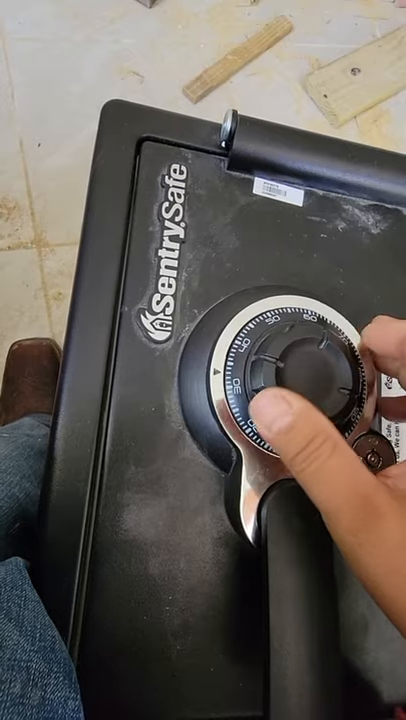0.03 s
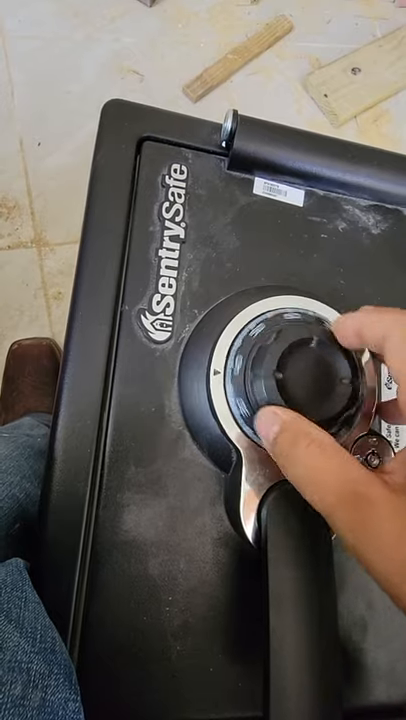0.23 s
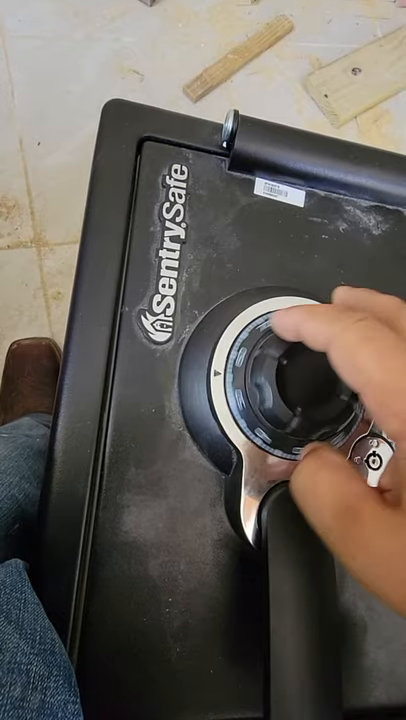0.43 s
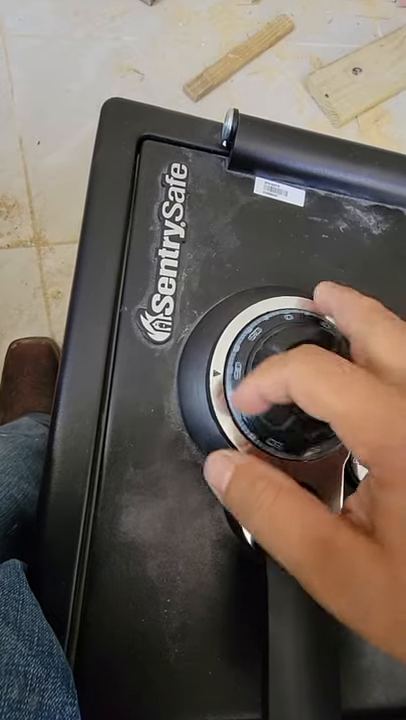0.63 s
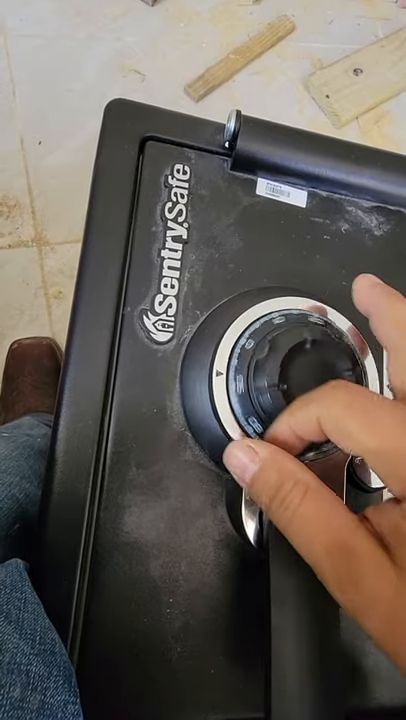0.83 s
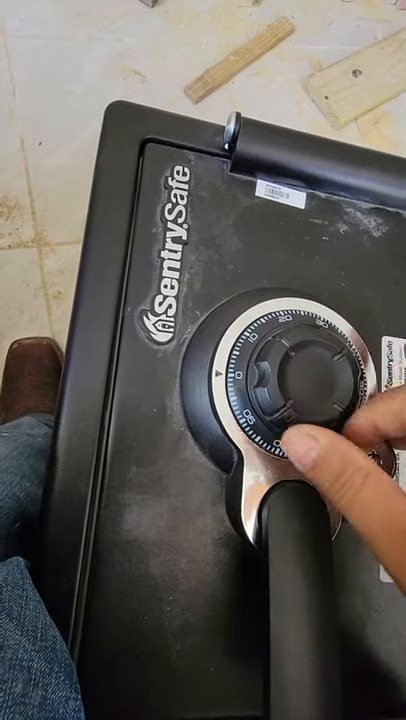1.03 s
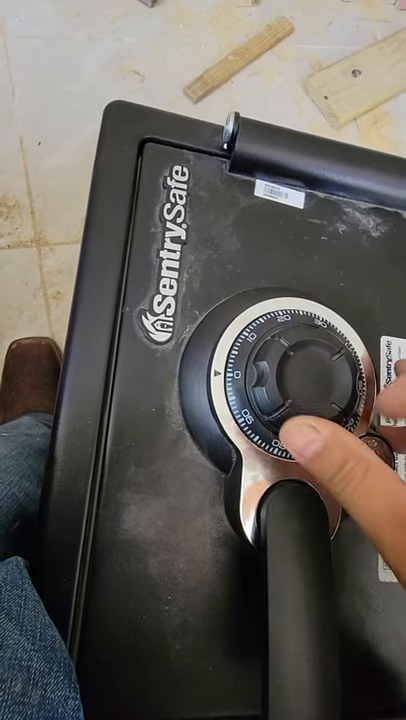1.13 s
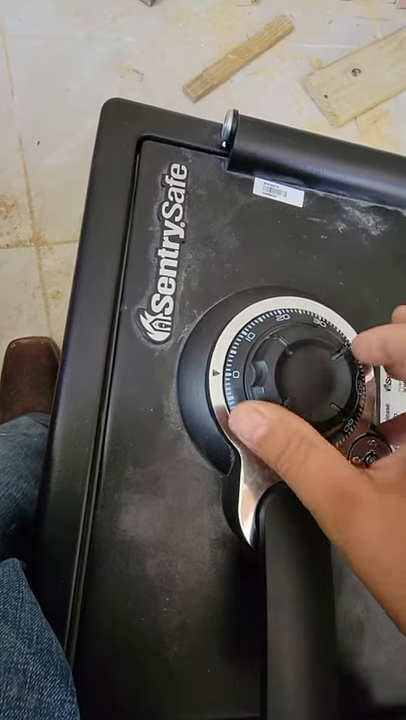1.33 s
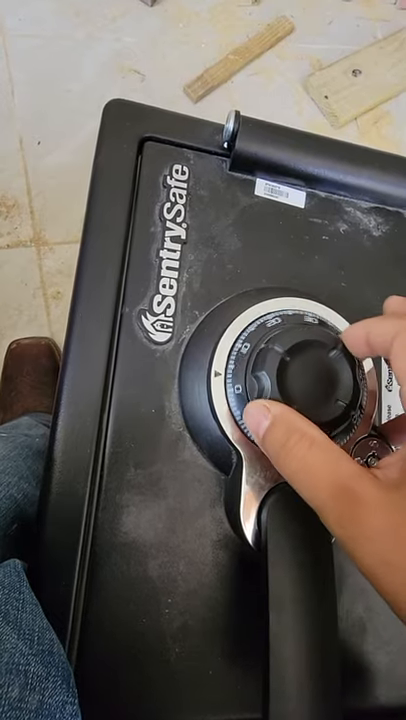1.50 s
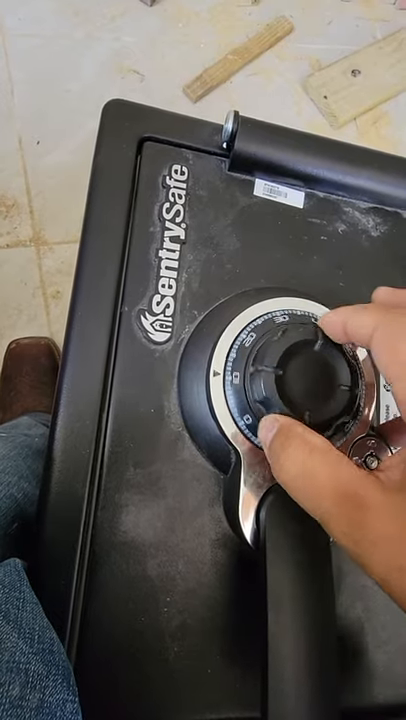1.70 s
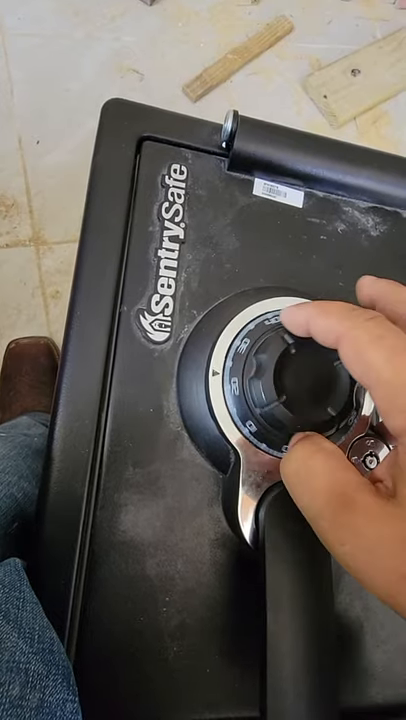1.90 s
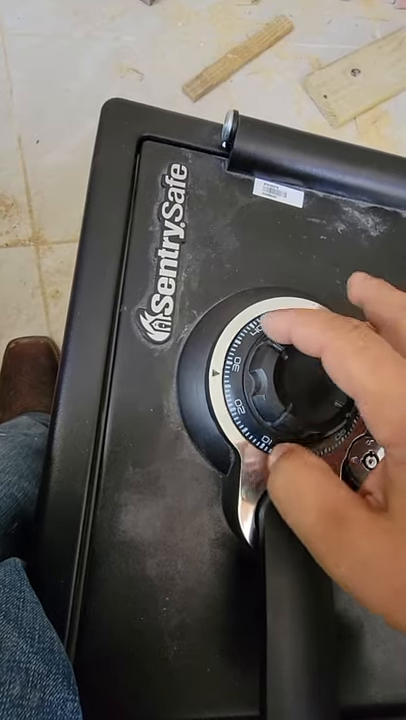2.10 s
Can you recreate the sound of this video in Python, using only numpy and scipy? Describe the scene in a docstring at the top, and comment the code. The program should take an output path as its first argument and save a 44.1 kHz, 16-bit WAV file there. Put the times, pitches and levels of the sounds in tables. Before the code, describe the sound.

A safe's combination dial is spun by hand, starting with a soft knock at 0.2 seconds and making two fast ratcheting whirrs that run together until about 0.95. Soft knocks follow, then a pause. From 1.45 to 1.9 seconds a slower turn gives separate, quickening metallic clicks with two tiny pings, trailing off in faint ticks by 2.1. The sound is close, in a small hard room with faint hiss.

```python
"""Combination dial of a safe

A hand spins the dial of a steel safe in a small hard room: two fast whirrs, a pause, then a slower
turn of separate clicks. Each ratchet tooth scrapes under a pawl, and the force excites the damped
modes of dial, door and hollow body. Fingers and loose wheels knock softly between the turns, and
the pawl pings twice. Reverberation and a faint steady hiss lie behind it all."""
import sys
import numpy as np
from scipy import signal
from scipy.fft import rfft, irfft
from scipy.io import wavfile
from scipy.ndimage import uniform_filter1d

SR = 44100
rng = np.random.default_rng(int(sys.argv[2]) if len(sys.argv) > 2 else 0)


def store_wav(level_fs):
    """Save 16-bit WAV to argv[1]."""
    pcm = np.round(np.clip(np.atleast_2d(level_fs), -1, 1) * 32767)
    wavfile.write(sys.argv[1], SR, pcm.T.astype(np.int16))


N = 94815
T, HZ = np.arange(N) / SR, np.fft.rfftfreq(N, 1 / SR)
DOOR_TOP_HZ, TREBLE_HZ, SNAP_S = 1190, 7570, 0.0034


# Rotation of the dial in the fast turns: t/s, teeth passed
DIAL_POSITION = [(.204, 0), (.2281, 2), (.2475, 4), (.2721, 6), (.3201, 11), (.3316, 12), (.3884, 16),
                 (.4004, 17), (.4508, 22), (.4947, 26), (.5037, 27), (.5316, 32), (.5703, 38), (.5936, 41),
                 (.6158, 43), (.6478, 45), (.6601, 46), (.6985, 50), (.7118, 51), (.7304, 52), (.7703, 53),
                 (.7868, 54), (.8563, 59), (.8672, 60), (.871, 61), (.8781, 62), (.9031, 64), (.9307, 66),
                 (.9467, 67)]
# Course of the fast turns: t/s, tooth force level/dB, door-band gain/dB, treble gain/dB
FAST_EFFORT = [(0.199, -30, 8.5, -0.5), (0.237, -22, -4, -4), (.265, -26.5, -1, -3.5), (0.309, -23, -6, -1),
               (.365, -29.5, -13, -0.5), (0.418, -23, -15.5, -1), (0.491, -23.5, -5.5, -4.5),
               (0.521, -20, -12.5, 4), (0.591, -21.5, -7, 1.5), (.63, -28, -0.5, 2.5),
               (0.677, -20.5, -1, 0), (0.736, -29.5, 1, 2.5), (.785, -25, 1.5, 2), (.872, -24, 3, 1.5),
               (.925, -25.5, 3.5, -3), (0.948, -32, 10.5, -2)]
# Spectrum of a fast scrape: f/Hz, relative level/dB
FAST_SPECTRUM = [(370, -51.5), (498, -13.5), (593, 0), (766, 0), (960, -0.5), (1340, -5.5), (1790, -5.5),
                 (2940, -5.5), (4040, 0.5), (4750, -10.5), (6000, -4.5), (7080, 0.5), (8440, -10),
                 (10700, -13), (15000, -12), (16000, -34.5)]
# Modes of the dial: f/Hz, relative level/dB, T60/s
DIAL_MODES = [(2680, 5, 0.1), (3580, 0.5, 0.07), (4036, 11, 0.081), (4220, -7, 0.12), (4184, -11, 0.11),
              (6650, -0.5, 0.17), (6927, -15.5, 0.082)]
# Mode of the knob: f/Hz, relative level/dB, T60/s
KNOB_MODES = [(1354, 0, 0.016)]
# Level of the knob's ring as the grip damps it: t/s, gain/dB
KNOB_GAIN = [(.47, -9.5), (.8, -22)]

def whirr():
    """Forced vibration: teeth scrape past the pawl at a rate set by the speed of the dial."""
    position_s, teeth = np.transpose(DIAL_POSITION)
    times = np.interp(np.arange(teeth[-1] + 1), teeth, position_s)
    effort_s, force_db, low_db, treble_db = np.transpose(FAST_EFFORT)
    levels_db = np.interp(times, effort_s, force_db)
    drive = scrapes(times, levels_db, rise_s=0.0036, fall_s=0.0048)
    rasp = amp(-1) * coloured(drive, FAST_SPECTRUM)
    dial = amp(-16) * ring(drive, DIAL_MODES)
    steel = shelved(rasp + dial + door(times, levels_db + 5), effort_s, low_db, treble_db)
    grip_gain = amp(np.interp(T, *np.transpose(KNOB_GAIN)))
    knob = grip_gain * band(ring(drive, KNOB_MODES), DOOR_TOP_HZ, "high")
    return steel + knob + body(times, levels_db)


# Teeth passing singly: t/s, force level/dB
SLOW_TEETH = [(0.1718, -45.5), (1.4538, -32), (1.4836, -32.5), (1.5103, -35.5), (1.5368, -30.5),
              (1.565, -38.5), (1.5982, -37), (1.624, -31), (1.6492, -35.5), (1.6763, -32.5), (1.7008, -30),
              (1.7229, -29), (1.743, -32.5), (1.7603, -29.5), (1.7772, -33.5), (1.7925, -29.5),
              (1.808, -32.5), (1.8203, -30.5), (1.8361, -28.5), (1.8525, -31.5), (1.8678, -28),
              (1.8857, -33.5), (1.9269, -37.5), (2.007, -47), (2.0458, -45), (2.0818, -47)]
# Spectrum of a slow scrape: f/Hz, relative level/dB
SLOW_SPECTRUM = [(350, -57.5), (603, -4.5), (960, -1), (1500, -5.5), (1970, -2.5), (2240, -10), (3980, -3),
                 (4750, -11), (6750, -3.5), (8710, -19.5), (16000, -33.5)]
# Timbre of the slow turn: t/s, door-band gain/dB, treble gain/dB
SLOW_TIMBRE = [(1.45, -2.5, 2.5), (1.71, 4, 2.5), (1.81, -3.5, 8), (1.88, 0, 10), (2.01, 0.5, -22)]

def clicks(snap_hz=5500):
    """Transient excitation: the pawl rides dully over each tooth and snaps brightly at its crest."""
    times, levels_db = np.transpose(SLOW_TEETH)
    ride = band(scrapes(times, levels_db, rise_s=0.0052, fall_s=0.0058), snap_hz, "low")
    snap = band(scrapes(times, levels_db, SNAP_S, SNAP_S), snap_hz, "high")
    drive = ride + snap
    rasp = amp(-1.5) * coloured(drive, SLOW_SPECTRUM)
    dial = amp(-13.5) * ring(drive, DIAL_MODES)
    steel = shelved(rasp + dial + door(times, levels_db + 2.5), *np.transpose(SLOW_TIMBRE))
    return steel + body(times, levels_db)


def scrapes(times, levels_db, rise_s, fall_s, likeness=0.75, size=1024):
    """Friction noise: each tooth gives a short, flat-spectrum rattle correlated with the one before."""
    envelope = burst(size / 2 / SR, rise_s, fall_s)[:size]
    force = np.zeros((2, N + size))
    grain = noise(size)
    for s, db in zip(times, levels_db):
        grain = likeness * grain + np.sqrt(1 - likeness ** 2) * noise(size)
        rattle = grain
        for _ in range(3):  # alternately confine in time and flatten in frequency
            phase = np.angle(rfft(rattle * envelope))
            rattle = irfft(np.exp(1j * phase))
        start = round(s * SR) - size // 2
        force[:, start:start + size] += amp(db) * np.linalg.norm(envelope) * rattle
    return force[:, :N]


# Modes of the door: f/Hz, relative level/dB, T60/s
DOOR_MODES = [(580.5, 3, 0.11), (757, 15.5, 0.057), (875, 2.5, 0.027), (1130, 5.5, 0.18)]

def door(times, levels_db, early_s=0.002465, lowest_hz=480):
    """Plate resonance: each tooth pushes the door, which rings but radiates little bass."""
    return band(ring(impulses(times - early_s, levels_db), DOOR_MODES), lowest_hz, "high")


# Modes of the hollow body: f/Hz, relative level/dB, T60/s
BODY_MODES = [(176, 3, 0.1), (208.5, 9, 0.047)]

def body(times, levels_db, coupling_db=-20, lowest_hz=100):
    """Box resonance: the pushes of the teeth make the hollow safe hum dully."""
    return band(ring(impulses(times, levels_db + coupling_db), BODY_MODES), lowest_hz, "high")


# Pings of the pawl: t/s, level/dB, f/Hz, T60/s
PAWL_PINGS = [(1.4358, -27.5, 6360, 0.014), (1.756, -32.5, 4250, 0.042)]

def pawl(rise_s=0.0007, crack_db=-11, lowest_hz=2000):
    """Metal impact: the pawl catches with a tiny broadband crack and rings at one frequency."""
    envelope = sum(amp(db + crack_db) * burst(s + rise_s, rise_s, SNAP_S) for s, db, _, _ in PAWL_PINGS)
    crack = band(coloured(noise() * envelope, SLOW_SPECTRUM), lowest_hz, "high")
    return crack + sum(damped_tone(*ping, rise_s) for ping in PAWL_PINGS)


# Soft knocks on the door: t/s, level/dB, f/Hz
DOOR_KNOCKS = [(.095, -61, 790), (.2255, -28.5, 768), (.237, -32, 591), (.953, -38.5, 688),
               (.974, -40, 717), (1.048, -48.5, 756), (1.345, -60, 657), (1.435, -54, 600),
               (2.135, -53.5, 590)]
# Dull thumps of the body: t/s, level/dB, f/Hz
BODY_THUMPS = [(.225, -34.5, 136), (.245, -40.5, 228.7), (0.959, -56.5, 235), (1.047, -59, 220)]

def handling():
    """Free vibration: knocks ring the door, and the body thumps as the dial starts and stops."""
    knocks = sum(damped_tone(*knock, t60=0.059, rise_s=0.001) for knock in DOOR_KNOCKS)
    thumps = sum(damped_tone(*thump, t60=0.11, rise_s=0.008) for thump in BODY_THUMPS)
    return np.array([amp(9) * knocks + thumps, np.zeros(N)])


# Fingers take hold: t/s
GRIP_TIMES = [0.12, 1.35]

def fingers():
    """Skin friction: fingertips brush the knob as they take hold."""
    envelope = sum(burst(s, rise_s=0.0081, fall_s=0.055) for s in GRIP_TIMES)
    return amp(-70) * coloured(noise() * envelope, SLOW_SPECTRUM)


# Spectrum of a sliding fingertip: f/Hz, relative level/dB
SLIP_SPECTRUM = [(8000, -31), (9500, -3), (10200, -17), (14000, -35)]

def slip():
    """Sliding friction: a fingertip leaves the knob with a thin hiss."""
    envelope = burst(peak_s=2.038, rise_s=0.013, fall_s=0.01)
    return amp(-62) * coloured(noise() * envelope, SLIP_SPECTRUM)


def flicker(x, depth_db=1.66, patch_cells=7):
    """Random modulation: smooth patches of gain in time and frequency keep the timbre shifting."""
    spectra = signal.stft(x, nperseg=256)[2]
    patches = rng.standard_normal(spectra.shape[1:])
    for axis in (0, 1):
        patches = uniform_filter1d(patches, patch_cells, axis)
    return signal.istft(spectra * amp(depth_db * unit_rms(patches)), nperseg=256)[1][:, :N]


# Likeness of the two ears' signals: f/Hz, coherence
EAR_COHERENCE = [(700, 0.9), (1500, 0.78), (5000, 0.01)]
# Interaural level difference: f/Hz, left minus right/dB
EAR_BALANCE = [(330, -10.5), (500, 7.5), (800, -2), (1800, 0), (2800, 2), (6500, -0.5), (11000, 2.5)]
# Interaural phase difference: f/Hz, lead of the left/rad
EAR_PHASE = [(170, 0), (550, -1.6), (800, .4), (1200, 1.7), (2000, 2.8), (4000, 5.6), (8000, 11.5),
             (16000, 22)]

def ears(pair):
    """Binaural cues: two unrelated streams become partly coherent left and right signals."""
    left, unrelated = rfft(pair)
    coherence = at_frequency(EAR_COHERENCE, HZ)
    side_db = at_frequency(EAR_BALANCE, HZ) / 2
    right = coherence * left + np.sqrt(1 - coherence ** 2) * unrelated
    right *= np.exp(-1j * at_frequency(EAR_PHASE, HZ))
    return irfft([left * amp(side_db), right * amp(-side_db)], N)


# Reverberation time of the room: f/Hz, T60/s
ROOM_DECAY = [(200, 0.42), (800, 0.34), (8000, 0.36), (15000, 0.22)]

def room(x, onset_s=0.0061):
    """Diffuse reverberation: dense reflections build up, then each band decays at its own rate."""
    t = T[:SR * 3 // 4]
    reflections = noise(len(t)) * (1 - np.exp(-(t / onset_s) ** 2))
    hz, frame_s, spectra = signal.stft(reflections, SR, nperseg=256)
    decay = amp(-60 * frame_s / at_frequency(ROOM_DECAY, hz)[:, None])
    tail = signal.istft(spectra * decay, SR, nperseg=256)[1]
    return signal.fftconvolve(x, tail / np.linalg.norm(tail[0]), axes=1)[:, :N]


# Spectrum of the background: f/Hz, relative level/dB
HISS_SPECTRUM = [(30, -16), (100, -2), (330, -0.5), (700, -5), (1600, -17), (4500, -15.5), (7000, -9),
                 (8300, -19.5), (16000, -25.5)]

def hiss():
    """Stationary noise: a faint, steady background."""
    return amp(-70) * coloured(noise(), HISS_SPECTRUM)


def ring(x, modes):
    """Modal superposition: x drives a sum of damped modes with unit total energy."""
    t = T[:SR // 8]
    response = sum(amp(db - 60 * t / t60) * np.cos(2 * np.pi * hz * t) for hz, db, t60 in modes)
    return signal.oaconvolve(x, response[None] / np.linalg.norm(response), axes=1)[:, :N]


def damped_tone(start_s, db, hz, t60, rise_s):
    """Damped oscillator: a sinusoid starts softly and decays exponentially."""
    t = np.maximum(T - start_s, 0)
    envelope = amp(db - np.minimum(60 * t / t60, 200)) * (1 - np.exp(-t / rise_s))
    return envelope * np.sin(2 * np.pi * hz * t)


def impulses(times, levels_db):
    """Impulse train: brief pushes in the first of two streams."""
    train = np.zeros((2, N))
    train[0, np.round(times * SR).astype(int).clip(0, N - 1)] = amp(levels_db)
    return train


def burst(peak_s, rise_s, fall_s, squareness=1.41):
    """Transient envelope: a swell to a rounded peak, then a decay."""
    distance = np.maximum((peak_s - T) / rise_s, (T - peak_s) / fall_s)
    return np.exp(-distance.clip(0, 20) ** squareness)


def shelved(x, times, low_db, treble_db):
    """Shelving filters: the door's band and the treble each follow a gain curve."""
    x = x + (amp(np.interp(T, times, low_db)) - 1) * band(x, DOOR_TOP_HZ, "low")
    return x + (amp(np.interp(T, times, treble_db)) - 1) * band(x, TREBLE_HZ, "high")


def coloured(x, spectrum):
    """Spectral shaping by a filter of unit energy."""
    return irfft(rfft(x) * unit_rms(amp(at_frequency(spectrum, HZ))), N)


def band(x, hz, kind):
    """Third-order "low" or "high" pass filter."""
    return signal.sosfiltfilt(signal.butter(3, hz, kind, fs=SR, output="sos"), x)


def noise(size=N):
    """White noise in two independent streams."""
    return rng.standard_normal((2, size))


def at_frequency(table, hz):
    """Interpolation on a log-frequency axis."""
    f, value = np.transpose(table)
    return np.interp(np.log(hz + 1), np.log(f + 1), value)


def unit_rms(x):
    """Normalisation to unit mean power."""
    return x / np.sqrt(np.mean(x ** 2) + 1e-20)


def amp(db):
    """Amplitude ratio of a level in decibels."""
    return 10 ** (np.asarray(db) / 20)


def scene():
    """Superposition: direct sound of the safe and the close pawl, their reverberation, and hiss."""
    safe = ears(flicker(whirr() + clicks()) + handling() + fingers() + slip())
    ping = amp(6) * pawl()
    background = hiss()
    reverberation = amp(-10.5) * room(safe + amp(-7) * ping)
    return safe + ping + reverberation + background


def record(dry, cutoff_hz=16300):
    """Band limiting: a steep low-pass filter removes the highest treble."""
    taps = signal.firwin(511, cutoff_hz, window=("kaiser", 9), fs=SR)
    return signal.oaconvolve(dry, taps[None], "same")


dry = scene()
out = record(dry)
store_wav(out)
```